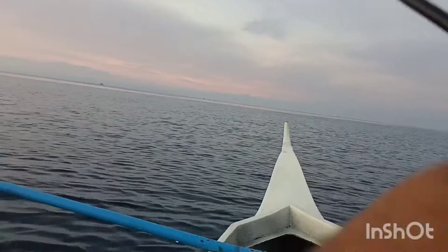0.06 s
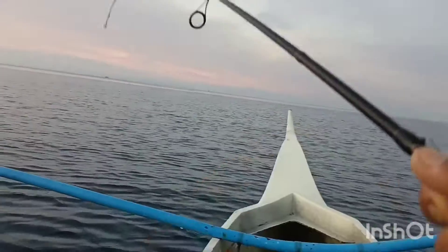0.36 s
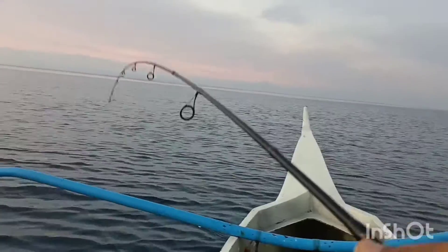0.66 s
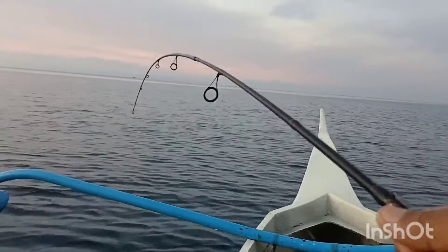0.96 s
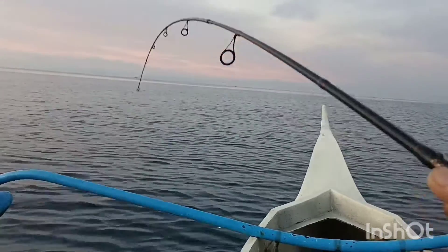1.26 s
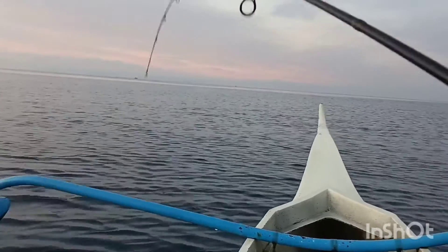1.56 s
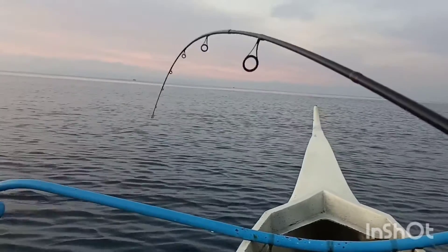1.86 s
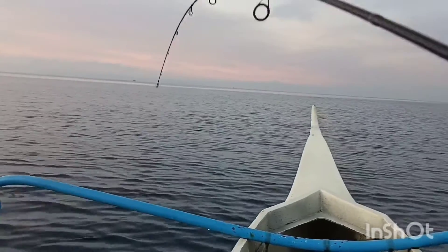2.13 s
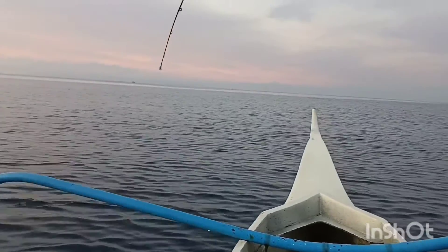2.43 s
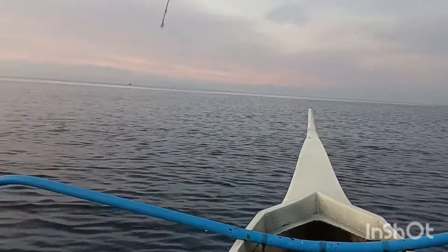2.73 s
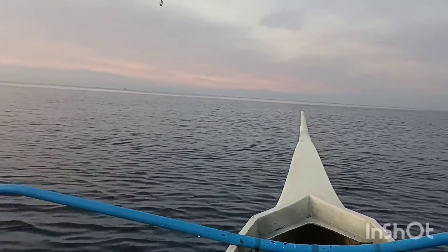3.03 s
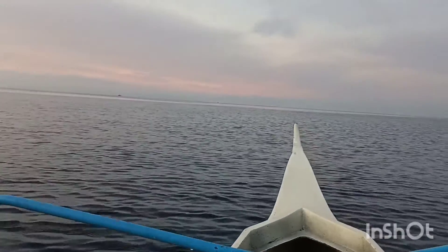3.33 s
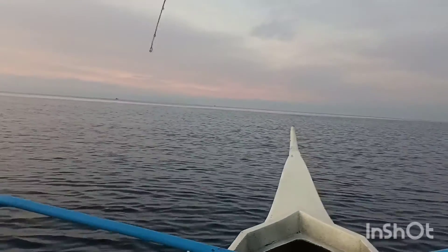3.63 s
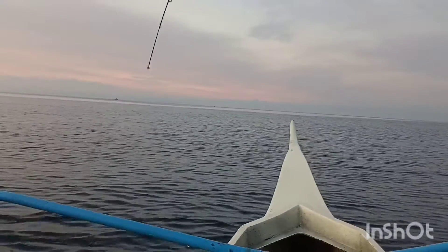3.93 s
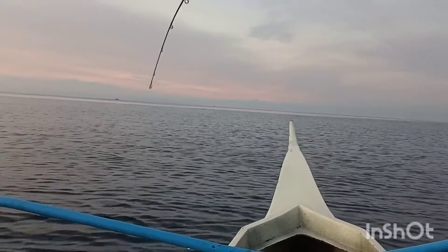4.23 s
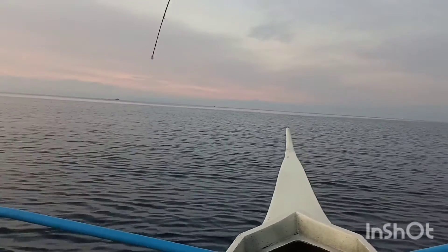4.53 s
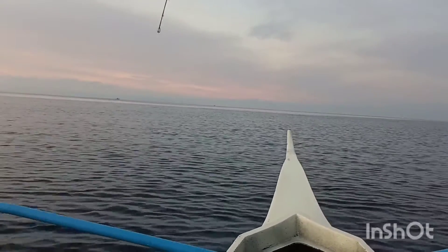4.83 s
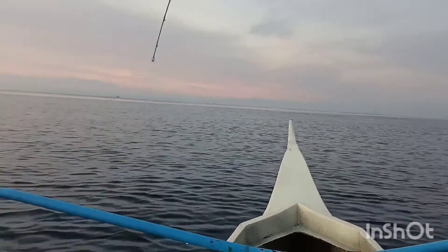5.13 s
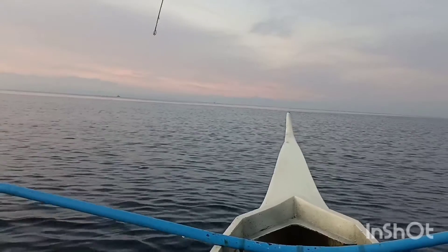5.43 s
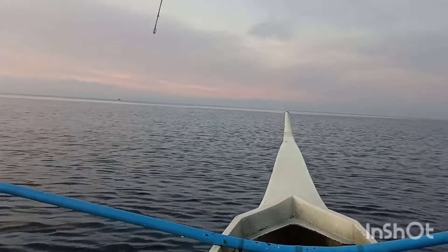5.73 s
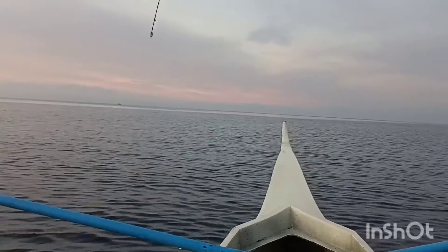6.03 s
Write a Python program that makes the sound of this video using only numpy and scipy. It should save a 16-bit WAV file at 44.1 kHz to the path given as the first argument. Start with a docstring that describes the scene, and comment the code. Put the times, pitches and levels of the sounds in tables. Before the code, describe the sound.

On a small boat at sea, a fishing line is wound in with a rasping whine and a few sharp ticks from the reel. Then a fish pulls line in four runs, and the drag's clicks merge into a bright, surging buzz over the whine. Single ticks fall between runs; the second is fastest, the last short and slow. The reel is close and slightly left, with water murmuring faintly at the hull.

```python
"""Water murmurs at the hull of a small boat on a calm sea. First an angler winds in, and the line's weave bumps
over the rod's guides with a rasping whine whose pitch follows its speed. The spool creeps in single ticks while
brief chirps sound and the taut line hums faintly. From 1.6 s a hooked fish takes line in four runs: the drag's
clicker spring snaps off each tooth of the turning spool, so the ticks merge into a fast buzz over the whine.
The second run is the fastest; the last, short and slow, ends at about 6 s."""
import sys
import numpy as np
from scipy import signal
from scipy.fft import rfft, irfft, next_fast_len
from scipy.io import wavfile
from scipy.ndimage import uniform_filter1d, map_coordinates

SR = 44100
rng = np.random.default_rng(int(sys.argv[2]) if len(sys.argv) > 2 else 0)


def write(x):
    x = np.atleast_2d(x).T
    wavfile.write(sys.argv[1], SR, np.round(np.clip(x, -1, 1) * 32767).astype(np.int16))


N = 268157

# The spool surges with the fish's pull. Each row: time in seconds, speed in teeth per second.
RUN_1 = [(1.593, 49.5), (1.766, 111.8), (1.834, 92.6), (1.919, 111.0), (2.101, 81.2), (2.248, 108.2),
         (2.426, 88.4), (2.543, 109.6), (2.722, 49.2)]
RUN_2 = [(3.445, 52.1), (3.61, 89.4), (3.731, 97.2), (3.866, 71.1), (4.04, 178.6), (4.163, 213.4),
         (4.219, 147.7), (4.444, 107.7), (4.628, 64.9)]
RUN_3 = [(4.795, 49.5), (4.97, 125.2), (5.108, 125.4), (5.285, 93.8), (5.448, 69.5), (5.519, 42.1)]
RUN_4 = [(5.66, 56.9), (5.702, 81.1), (5.804, 74.8), (5.871, 53.5), (6.028, 56.6), (6.076, 46.6)]
RUNS = (RUN_1, RUN_2, RUN_3, RUN_4)
# The four runs. Each row: blow level, brightness, rasp level and whine level in dB, weave bumps per tooth.
RUN_TRAITS = [(-36, 5, -52, -54.5, 6.25), (-34, 5, -50.5, -61, 5.75), (-34.5, 5.5, -50.5, -59, 5.85),
              (-36, 6.5, -49.5, -61, 5.9)]
# Single teeth as the spool creeps. Each row: time in seconds, blow level in dB, brightness in dB.
CREEP_TICKS = [(0.029, -69, 13), (0.4849, -40.5, 9), (0.5321, -40, 11), (0.6194, -41, 13.5),
               (0.7172, -42, 10.5), (0.8075, -43, 13), (1.0506, -40.5, 14.5), (1.099, -38.5, 1.5),
               (1.3084, -38.5, 7), (1.3585, -38.5, 2), (1.5724, -43, -5), (2.7442, -33.5, 9.5),
               (2.7764, -34, 1.5), (2.8253, -34, 0), (2.875, -34, 0), (2.9025, -36.5, 12.5),
               (2.9217, -37, 13), (2.9439, -32, 9.5), (2.9636, -33, 8.5), (2.9876, -34, 12.5),
               (3.0112, -31.5, 0.5), (3.042, -34.5, 5), (3.1182, -33.5, 6), (3.3609, -33.5, 11),
               (3.3932, -37, 16.5), (3.4198, -36, 11.5), (4.6428, -33.5, 11.5), (4.6672, -36.5, 10.5),
               (4.6945, -35.5, 13.5), (4.7275, -38, 13), (4.7686, -34, 4), (5.5442, -36.5, 9),
               (5.5803, -37, 10.5), (5.6145, -36, 10), (5.6402, -33, 10)]
# The crank surges while winding in. Each row: time in seconds, pitch of the line in Hz.
WINDING_PITCH = [(0, 633), (.07, 795.5), (.195, 655.6), (.275, 1145), (.39, 1091), (.535, 775),
                 (.625, 1031), (.715, 1096), (.785, 685), (.82, 598)]
# Normal modes of each part. Each row: frequency in Hz, bandwidth in Hz, relative level in dB.
SPOOL_MODES = [(2474, 810, 0.5), (4310, 240, 2), (4810, 670, 8.5), (5290, 510, 17), (5770, 780, 10.5),
               (7890, 386, 11.5)]
SPRING_MODES = [(10750, 420, -4), (11620, 520, -4.5), (13120, 380, -4.5), (14200, 200, 0),
                (14900, 380, -2.5), (15500, 450, -8)]
ROD_MODES = [(477, 131, -10.5), (667.4, 57, 1.5), (753, 138, -3.5), (1085, 500, -7)]
GUIDE_MODES = [(1555, 110, -7.5), (1725, 20.4, 1), (2214, 277, 3), (2550, 73, 7.5), (2827, 51, 7.5),
               (3500, 1500, -8), (5700, 650, -7.5)]
# Partials of the line on the guides. Each row: multiple of the pitch, relative level in dB.
LINE_PARTIALS = [(1, 3), (1.5, -9), (2, 1.5), (2.5, -9), (3, -4.5), (4, -7.5), (5, -11.5)]
# The line bites on a guide. Each row: centre and length in seconds, pitch in Hz, level in dB.
BITES = [(0.017, .07, 680.5, -57), (.1, 0.096, 750, -57), (0.179, 0.064, 661.5, -54), (.79, .05, 659, -60),
         (1.632, 0.077, 639.6, -55.5), (1.899, 0.082, 655, -44.5), (2.921, 0.071, 700, -67.5),
         (2.991, 0.046, 562, -66), (3.485, .09, 709, -60), (4.369, .11, 709, -52), (5.14, 0.086, 692, -49),
         (5.7, 0.056, 701, -65), (5.759, 0.059, 460, -63), (5.931, 0.16, 685, -66)]
# The taut line hums while the spool creeps. Each row: start and end in seconds, first and last pitch
# in Hz, levels of fundamental and octave in dB.
HUM_NOTES = [(1.09, 1.593, 964, 849, -76, -90), (2.968, 3.38, 1008, 980, -79.5, -71.5)]
# Brief chirps; the first three are the rod's guides ringing as the rod is handled. Each row: centre and length
# in seconds, first and last pitch in Hz, level in dB.
SQUEAKS = [(.9, 0.082, 4350, 4260, -88), (0.923, 0.055, 2900, 2840, -78), (.95, 0.086, 2580, 2500, -79.5),
           (1.287, 0.043, 6300, 5500, -67), (3.175, 0.044, 5450, 5100, -70),
           (3.293, 0.046, 5410, 4870, -76)]
# Spectrum of the water. Each row: frequency in Hz, relative spectral density in dB.
SEA_SPECTRUM = [(15, -53.5), (30, -12.5), (90, -3.5), (145, 0), (350, -11), (550, -28.5), (900, -13),
                (1400, -34), (2200, -22), (4000, -36), (8000, -38), (16000, -42)]
# Decay of sound scattered by the boat. Each row: frequency in Hz, time to fall 60 dB in seconds.
BOAT_DECAY = [(300, 0.13), (2000, 0.096), (6000, 0.034), (15000, 0.014)]
# The reel's place in stereo. Each row: frequency in Hz, left level minus right in dB.
REEL_BALANCE = [(2000, 9), (5000, 3), (10500, -0.5), (12500, 7), (14200, 6.5), (16000, 2)]

REFERENCE_SPEED = 100  # teeth per second; a run's blow, brightness and rasp are given at this speed
WINDING_BUMPS = 5.9  # bumps of the weave per tooth's worth of line, when winding in


def amp(db):
    """Amplitude ratio of a level in decibels."""
    return 10 ** (np.asarray(db) / 20)


def unit(x):
    """Normalisation to an rms of 1."""
    return x / np.sqrt(np.mean(x ** 2) + 1e-20)


def even(x):
    """Running normalisation: the rms is held near 1 over each tenth of a second."""
    power = uniform_filter1d(np.mean(x ** 2, axis=0), SR // 10)
    return x / np.sqrt(np.abs(power) + 1e-12)


def along(points, hz):
    """Interpolation of (Hz, value) points on a logarithmic frequency axis."""
    knots_hz, values = np.transpose(points)
    return np.interp(np.log(hz + 1), np.log(knots_hz + 1), values)


def curve(points, **ends):
    """Linear interpolation of (seconds, value) points at every sample."""
    return np.interp(np.arange(N) / SR, *np.transpose(points), **ends)


def wobble(rate):
    """Smooth random modulation with `rate` knots a second."""
    knots = rng.standard_normal(int(N * rate / SR) + 4)
    return unit(map_coordinates(knots, [np.arange(N) * rate / SR]))


def noise_pair(correlation):
    """Partial coherence: two white noises mixed from a common and an opposed part."""
    mid, side = rng.standard_normal((2, N))
    angle = np.arccos(correlation) / 2
    return np.cos(angle) * mid + np.sin(angle) * np.array([side, -side])


def fuzzy_tone(pitch_hz, width_hz):
    """Random modulation spreads a moving tone into a narrow band of noise, separately in each channel."""
    phase = 2 * np.pi * np.cumsum(pitch_hz) / SR
    cosine, sine = np.cos(phase), np.sin(phase)
    return np.array([wobble(width_hz) * cosine + wobble(width_hz) * sine for _ in range(2)])


def filtered(x, response):
    """Linear filtering: the spectrum is multiplied by a complex frequency response."""
    size = next_fast_len(N + SR // 4)
    return irfft(rfft(x, size) * response(np.fft.rfftfreq(size, 1 / SR)), size)[..., :N]


def low_cut(x, edge_hz, order):
    """Causal high-pass filtering."""
    return signal.sosfilt(signal.butter(order, edge_hz, "high", fs=SR, output="sos"), x)


def ring(x, modes):
    """Modal superposition: x drives damped resonators of alternating sign, with unit power gain overall."""
    def response(hz):
        total = sum((-1) ** k * amp(db) * 1j * hz * width / (centre ** 2 - hz ** 2 + 1j * hz * width)
                    for k, (centre, width, db) in enumerate(modes))
        return total / np.sqrt(np.mean(np.abs(total) ** 2))
    return filtered(x, response)


def pan(x, left_db):
    """A level difference between the channels places a sound to the left."""
    return x * amp([[left_db / 2], [-left_db / 2]])


def sea():
    """Small waves along the hull give low-frequency noise with a slight amplitude modulation."""
    water = unit(filtered(noise_pair(0.68), lambda hz: amp(along(SEA_SPECTRUM, hz))))
    return water * amp(-72 + 0.88 * wobble(10))


def boat_scatter(x):
    """Scattering from hull and angler gives a short diffuse tail whose treble dies first."""
    hz, t, spectrum = signal.stft(rng.standard_normal((2, SR // 5)), SR, nperseg=128)
    decay = amp(-60 * t / along(BOAT_DECAY, hz)[:, None])
    _, tail = signal.istft(spectrum * decay, SR, nperseg=128)
    return signal.fftconvolve(x, tail / np.linalg.norm(tail[0]), axes=1)[:, :N]


def chirps():
    """Brief falling chirps, each a gliding tone under a short swell."""
    t, sound = np.arange(N) / SR, np.zeros(N)
    for centre_s, length_s, start_hz, end_hz, db in SQUEAKS:
        pitch = np.interp(t, [centre_s - length_s / 2, centre_s + length_s / 2], [start_hz, end_hz])
        swell = amp(db) * np.exp(-(np.pi * (t - centre_s) / length_s) ** 2)
        sound += swell * np.sin(2 * np.pi * np.cumsum(pitch) / SR)
    return sound * (1 + 0.5 * wobble(400))


def line_hum():
    """The line vibrates as a stretched string, its pitch sinking as the tension eases."""
    t, sound = np.arange(N) / SR, np.zeros((2, N))
    fade_s, width_hz = 0.028, 80
    for start, end, start_hz, end_hz, fundamental_db, octave_db in HUM_NOTES:
        pitch = np.interp(t, [start, end], [start_hz, end_hz])
        envelope = np.clip(np.minimum(t - start, end - t) / fade_s, 0, 1)
        sound += envelope * amp(fundamental_db) * fuzzy_tone(pitch, width_hz)
        sound += envelope * amp(octave_db) * fuzzy_tone(2 * pitch, width_hz)
    return sound


def rod_squeals():
    """Transient excitation: the rod squeals briefly each time the line bites on a guide."""
    t = np.arange(N) / SR
    centre_s, length_s, pitch_hz, db = np.transpose(BITES)
    nearest = np.searchsorted((centre_s[1:] + centre_s[:-1]) / 2, t)
    swell = amp(db[nearest]) * np.exp(-(np.pi * (t - centre_s[nearest]) / length_s[nearest]) ** 2 / 2)
    return swell * fuzzy_tone(pitch_hz[nearest], width_hz=85)[:1]


def rod_whine(pitch, gain):
    """Frequency pulling: the bumps shake the rod, whose main mode draws their pitch towards its own."""
    lock_hz, range_hz, pull = 641.7, 169.9, 0.45
    detuning_hz = pitch - lock_hz
    pulled_hz = pitch - pull * detuning_hz * np.exp(-(detuning_hz / range_hz) ** 2)
    drive = fuzzy_tone(pulled_hz, width_hz=90) + amp(12.5) * noise_pair(0)
    whine = unit(low_cut(ring(drive, ROD_MODES), edge_hz=330, order=4)[:1])
    rod = gain * whine + rod_squeals()
    lag_s = np.array([[0], [0.0004]])  # one body is heard in both channels, later on the right
    return filtered(rod, lambda hz: np.exp(-2j * np.pi * hz * lag_s))


def line_speed(tooth_s, winding):
    """Speed in teeth per second: set by the crank while winding, then the reciprocal of the tick period."""
    gap = np.clip(np.searchsorted(tooth_s, np.arange(N) / SR), 1, len(tooth_s) - 1) - 1
    paying_out = 1 / np.diff(tooth_s)[gap]
    winding_in = curve(WINDING_PITCH) / WINDING_BUMPS
    return uniform_filter1d(np.where(winding, winding_in, paying_out), SR // 50)


def line_on_guides(tooth_s):
    """Forced vibration: the weave bumps over the guides, which rasp, and drives the rod, which whines."""
    t = np.arange(N) / SR
    winding = t < WINDING_PITCH[-1][0]
    speed = line_speed(tooth_s, winding)
    run_index = np.searchsorted([run[0][0] for run in RUNS[1:]], t)
    _, _, rasp_db, whine_db, bumps = np.array(RUN_TRAITS)[run_index].T
    pitch = speed * np.where(winding, WINDING_BUMPS, bumps) * (1 + 0.03012 * wobble(50))
    partials = sum(amp(db) * fuzzy_tone(k * pitch, width_hz=110) for k, db in LINE_PARTIALS)
    # Slow line scrapes coarsely; fast line zings, and so does line that is wound in.
    coarse_db = np.where(winding, 5.5, np.interp(pitch, [750, 1100], [12, 10.5]))
    drive = partials + amp(coarse_db) * noise_pair(0)
    rasp = even(low_cut(ring(drive, GUIDE_MODES), edge_hz=750, order=2))
    # The line catches and lets go, so the rubbing sputters and the grip comes and goes.
    sputter, grip = wobble(45), wobble(18)
    stall_speed = 56  # teeth per second below which the whine dies away
    whine_db = np.where(winding, -62, whine_db) + 1.6 * grip + 1.57 * sputter
    whine = rod_whine(pitch, gain=amp(whine_db) / (1 + (stall_speed / speed) ** 2))
    rasp_db = np.where(winding, -55.5, rasp_db) + 1.24 * sputter
    rasp *= amp(rasp_db + 10 * np.log2(speed / REFERENCE_SPEED))  # 10 dB per doubling of speed
    return pan(whine, left_db=9.5) + pan(rasp, left_db=4.5)


def washer_hiss():
    """Sliding friction: the drag washers hiss with an amplitude proportional to the spool's speed."""
    speed = sum(curve(run, left=0, right=0) for run in RUNS)
    spool = ring(noise_pair(0.23), SPOOL_MODES)
    spring = amp(11.5) * ring(noise_pair(0.25), SPRING_MODES)
    hiss = spool + spring + amp(11) * noise_pair(0)
    return hiss * amp(-54.5) * uniform_filter1d(speed / speed.max(), SR // 50)


def tooth_ticks(jitter_s):
    """Rotation is the integral of speed: one tick per tooth, merged in time order with CREEP_TICKS."""
    rows = list(CREEP_TICKS)
    uneven_db, uneven_bright_db = 1.12 * wobble(28), 1.56 * wobble(28)  # the spool runs a little unevenly
    for run, (blow_db, bright_db, *_) in zip(RUNS, RUN_TRAITS):
        start, end = round(run[0][0] * SR), min(round(run[-1][0] * SR), N)
        speed = curve(run)
        teeth_passed = np.cumsum(speed[start:end]) / SR
        at = start + np.searchsorted(teeth_passed, np.arange(teeth_passed[-1]))
        tooth_s = at / SR + jitter_s * rng.standard_normal(len(at))
        blow_scatter_db, bright_scatter_db = 1.5 * rng.standard_normal((len(at), 2)).T
        # A fast spool gives the spring less time to bend: each tick is 1 dB softer per octave, and duller.
        octaves = np.log2(speed[at] / REFERENCE_SPEED)
        blows_db = blow_db - octaves + uneven_db[at] + blow_scatter_db
        brights_db = bright_db - 0.7 * octaves + uneven_bright_db[at] + bright_scatter_db
        rows += zip(tooth_s, blows_db, brights_db)
    return np.array(sorted(rows))


def strike(tooth_s, db, modes, chatter_share, chatter_t60, tremble_db, correlation):
    """Impact excitation: a clean snap and a swelling, dying burst of noisy chatter ring the modes."""
    # The spring rebounds within a millisecond or so, colouring each tick differently.
    rebound_s = tooth_s + rng.uniform(0.0003, 0.0013, len(tooth_s))
    contacts = np.clip(np.round(np.concatenate([tooth_s, rebound_s]) * SR).astype(int), 0, N - 1)
    blows = np.bincount(contacts, amp(np.concatenate([db - 1, db - 7.5])), N)
    # Each tick swells in with a brief noise, snaps and trembles.
    t, tremble_t60 = np.arange(SR // 20) / SR, 0.085
    before_s = t[:SR // 150][::-1]
    swell = np.exp(-before_s / 0.00077) + amp(-14.5) * np.exp(-before_s / 0.0021)
    snap = amp(-60 * t / chatter_t60) + amp(tremble_db - 60 * t / tremble_t60)
    burst_power = np.concatenate([swell, snap]) ** 2
    power = signal.fftconvolve(blows ** 2, burst_power / burst_power.sum())[len(swell):][:N]
    chatter = np.sqrt(np.abs(power)) * noise_pair(correlation)
    return ring(np.sqrt(1 - chatter_share) * blows + np.sqrt(chatter_share) * chatter, modes)


def reel_drag(ticks):
    """Free vibration: spring and spool ring as the clicker snaps off each tooth, over the washers' hiss."""
    tooth_s, blow_db, bright_db = ticks.T
    spool = strike(tooth_s, blow_db, SPOOL_MODES,
                   chatter_share=0.38, chatter_t60=0.011, tremble_db=-21, correlation=0.065)
    spring = strike(tooth_s, blow_db + bright_db, SPRING_MODES,
                    chatter_share=0.65, chatter_t60=0.019, tremble_db=-21.5, correlation=0.14)
    reel = amp(20) * spool + amp(17) * spring + washer_hiss()
    reel = low_cut(reel, edge_hz=1900, order=5)  # parts this small radiate no bass
    right_lag_s = 0.000205

    def placement(hz):
        left_gain = amp(along(REEL_BALANCE, hz) / 2)
        return np.array([left_gain, np.exp(-2j * np.pi * hz * right_lag_s) / left_gain])
    return filtered(reel, placement)


def scene():
    """Superposition: the spool's teeth time both the clicker and the line, and the sea lies around."""
    ticks = tooth_ticks(jitter_s=0.0001)
    reel = reel_drag(ticks)
    reel = reel + amp(-11.5) * boat_scatter(reel)
    return reel + line_on_guides(ticks[:, 0]) + line_hum() + chirps() + sea()


def record(dry):
    """Band limiting: a steep low-pass removes the highest treble."""
    edge_hz = 15850
    return filtered(dry, lambda hz: 1 / (1 + (hz / edge_hz) ** 90))


dry = scene()
out = record(dry)
write(out)
```